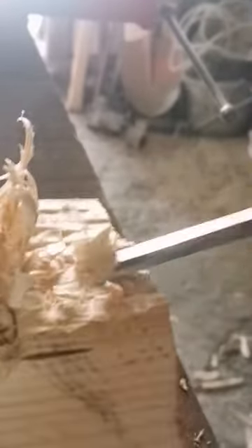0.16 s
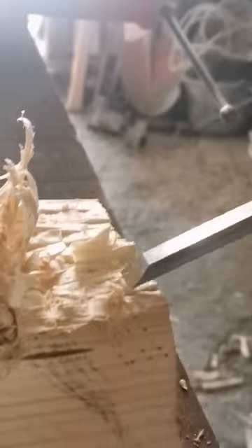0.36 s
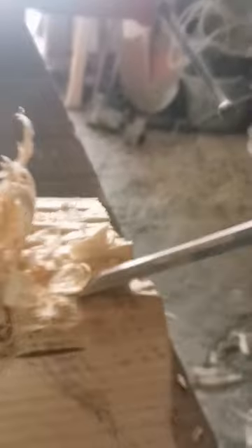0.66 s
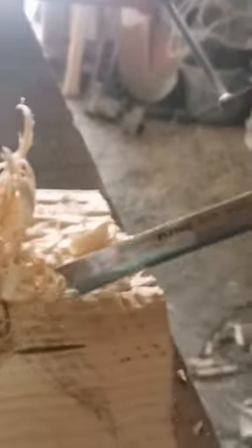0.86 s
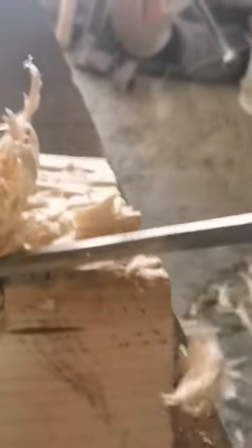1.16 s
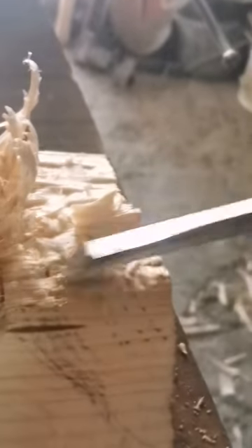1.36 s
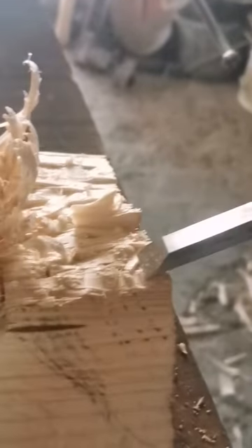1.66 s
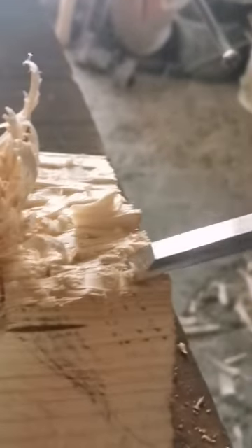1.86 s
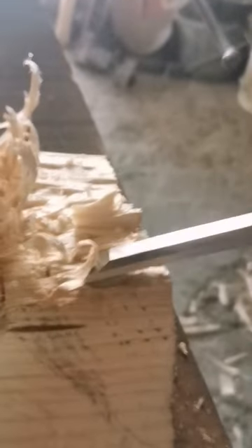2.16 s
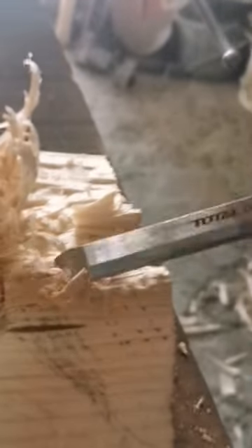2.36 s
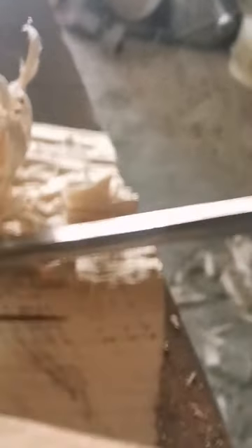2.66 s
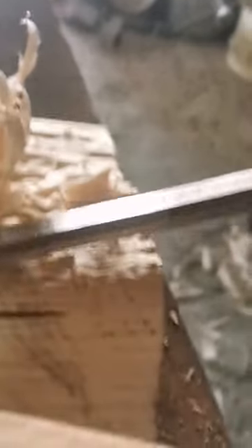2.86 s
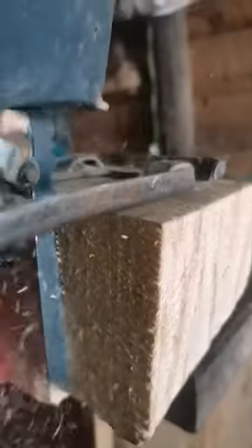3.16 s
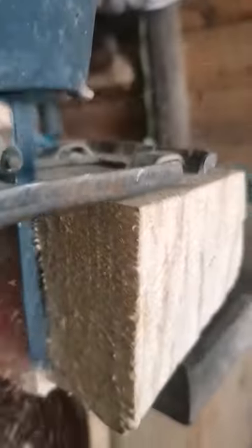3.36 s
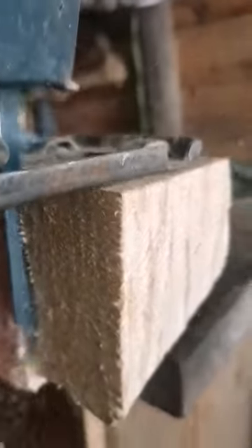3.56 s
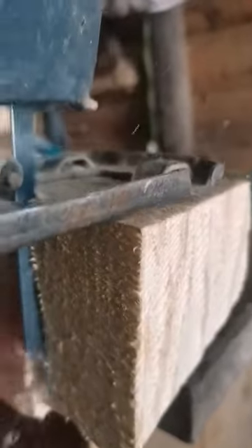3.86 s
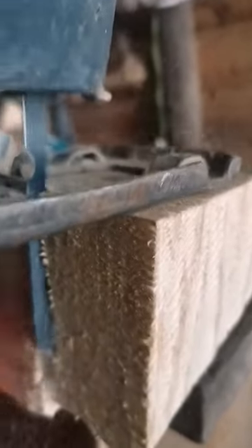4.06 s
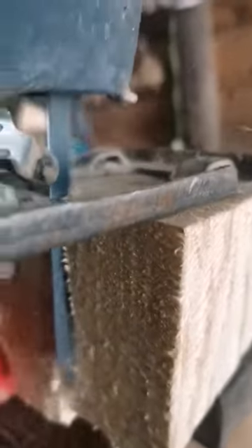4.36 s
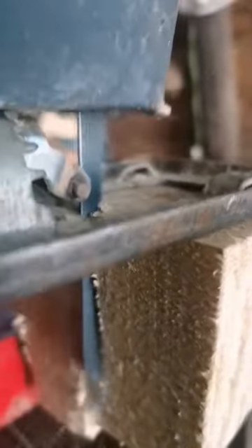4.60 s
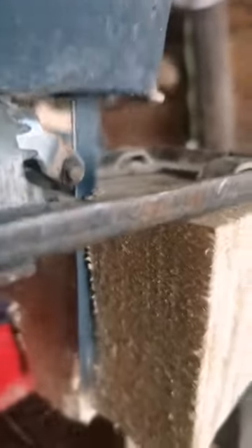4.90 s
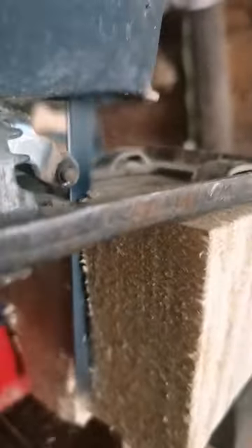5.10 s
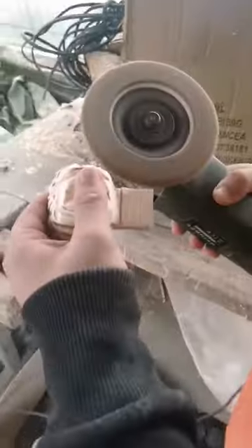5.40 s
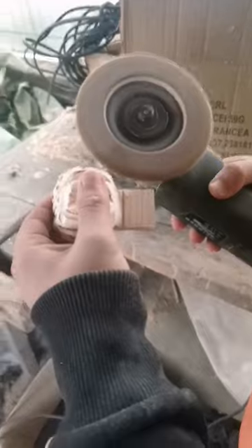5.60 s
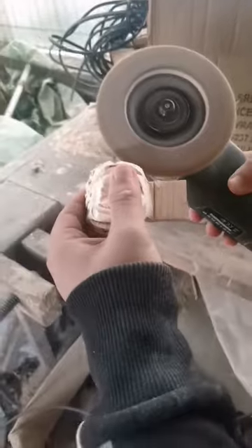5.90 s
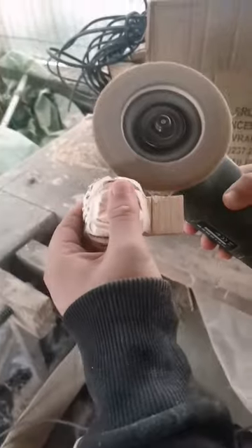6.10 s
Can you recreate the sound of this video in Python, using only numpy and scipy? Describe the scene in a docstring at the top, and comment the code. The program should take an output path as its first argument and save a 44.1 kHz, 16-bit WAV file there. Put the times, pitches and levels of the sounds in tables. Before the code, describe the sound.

Stereo close-up of woodworking in three hard-cut parts. First, about three seconds of chisel work, with stick-slip scrapes, crunching splinters, dull thuds and little steel ticks, body weighted to the right and a short dull room tail. Then a continuous jigsaw, revving up slightly, raspy and buzzing. Last, after a short gap, an abrasive grinder hisses and whines.

```python
"""A hand chisel pares a wooden block, close up in a small shop; then two power tools follow, with hard cuts.
Chisel: the edge sticks and slips, fibres crackle, chips snap, the edge knocks home and the bench rumbles on.
Jigsaw: it runs up to speed through a plank, made of rasping noise, clacks, a fan whistle and motor tones.
Grinder: after a short silence a sanding disc scours wood, made of gritty noise under motor and gear tones."""
import sys
import numpy as np
from scipy import signal
from scipy.fft import rfft, irfft, next_fast_len
from scipy.io import wavfile
from scipy.ndimage import uniform_filter1d, map_coordinates

SR = 44100
rng = np.random.default_rng(int(sys.argv[2]) if len(sys.argv) > 2 else 0)


def file_out(sig):
    """Save sig as 16-bit WAV at sys.argv[1]."""
    # one column per channel
    cols = np.atleast_2d(sig).T
    # limit, then scale
    lim = np.clip(cols, -1, 1)
    pcm = np.round(lim * 32767).astype(np.int16)
    wavfile.write(sys.argv[1], SR, pcm)


N = 275184
TIME = np.arange(N) / SR

# chisel strokes: start [t/s], length [t/s], block [level/dB], fibre crackle [level/dB], nominal slip rate [f/Hz],
# unevenness of the slips [0-1], hollow ring [f/Hz], hollow ring [level/dB]
STROKES = [(0.35, 0.0037, -30, -50.5, 255, 0.37, 1250, -40.5),
           (0.393, 0.023, -24, -56.5, 206, 0.31, 720, -66),
           (0.702, 0.011, -32.5, -47, 231, 0.33, 1330, -50),
           (0.88, 0.024, -22.5, -34.5, 241.3, 0.25, 770, -41),
           (1.086, 0.041, -27, -32.5, 271.7, 0.34, 720, -31.5),
           (1.268, 0.043, -23, -33.5, 308, 0.16, 725, -34),
           (1.572, 0.067, -35.5, -56, 194.6, 0.22, 1250, -51),
           (1.64, 0.075, -22.5, -52, 99.5, 0.08, 1250, -47), (1.812, 0.026, -35, -49, 199, 0.33, 560, -51),
           (2.009, 0.01, -21, -38.5, 226.6, 0.12, 710, -28), (2.179, 0.048, -22.5, -44, 270, 0.1, 740, -29),
           (2.311, 0.034, -22.5, -38.5, 299.5, 0.09, 720, -31),
           (2.361, 0.014, -30.5, -37.5, 309, 0.15, 920, -34.5),
           (2.54, 0.038, -24, -35.5, 294.7, 0.26, 760, -36.5),
           (2.665, 0.053, -21, -35, 259.4, 0.26, 650, -38), (2.724, 0.018, -28, -37, 237, 0.35, 673, -38)]
# chips snapping off: time [t/s], crack before a shared trim [level/dB], left minus right [level/dB],
# lowest ring of the blade [f/Hz], ring [level/dB]
CHIP_SNAPS = [(0.0671, -34, 11, 3540, -44), (0.89, -24, 3, 3240, -32.5), (1.056, -32, 2, 2870, -55),
              (1.121, -42, 0, 3220, -43), (1.3328, -29, -13.5, 2850, -26.5), (2.1837, -30, 9, 2720, -45),
              (2.3545, -18, 11, 2950, -30), (2.5358, -47, 4, 2850, -34), (2.581, -31, 4, 2880, -43),
              (2.69, -31, 16, 2940, -33.5)]
# the block is shoved against the bench: time [t/s], starting strength before the left side is lowered [level/dB]
SHOVES = [(1.286, -20.5), (1.695, -17), (2.698, -15.5)]
# the edge breaks through and knocks into firm wood: time [t/s], peak of the thud [level/dB],
# note of the block [f/Hz], tick of the edge before it is split left and right [level/dB]
KNOCKS = [(0.402, -21, 190, -33.5), (0.7157, -7, 194, -28.5), (0.882, -11.5, 270, -26.5),
          (0.903, -10.5, 200, -36), (1.292, -7, 354, -18.5), (1.493, -20, 211, -33),
          (1.627, -11, 330, -27.5), (1.688, -25, 288, -25.5), (2.01, -9, 235, -34),
          (2.073, -18.5, 317, -36), (2.182, -10, 241, -22), (2.356, -17, 317, -33),
          (2.537, -17, 297, -36.5), (2.703, -11, 239, -16)]
# the blade brushes through loose shavings: time [t/s], rustle [level/dB]
BRUSHES = [(0.219, -50), (2.94, -48)]
# resonances of the block on its bench: centre [f/Hz], width [f/Hz], left [level/dB], right [level/dB]
BLOCK_MODES = [(113.6, 45, -9, -22), (170.4, 19, 5.5, 17), (215, 48, 4.5, 15), (281, 55, -29.5, 19),
               (355, 18.5, 12.5, -0.5), (530, 11, -10.5, -5.5), (715, 28, -13, 0), (940, 76, -2.5, -2.5)]
# modes of the blade: multiple of its lowest ring, relative [level/dB], decay [t/s]
BLADE_MODES = [(1, 0, .0042), (1.94, -4, .0016), (2.44, -1, .0016)]
# relative spectrum of tearing fibres: [f/Hz], left [level/dB], right [level/dB]
FIBRE_COLOUR = [(690, -22, -4.5), (1200, -4.5, 1), (2040, -9, -1), (4300, -3.5, 2), (6580, -2, 1),
                (8500, -9, -14.5), (14100, -7.5, -15)]
# relative spectrum of the bench rumble: [f/Hz], left [level/dB], right [level/dB]
BENCH_COLOUR = [(30, -28, -24), (61.5, -9.5, -4.5), (95.5, -15, -11), (328, -28.5, -20.5), (6000, -74, -72)]
# relative spectrum of the faint steady hiss of the shop: [f/Hz], [level/dB]
HISS_COLOUR = [(300, 7), (1600, -4), (14000, -13)]
# jigsaw loudness over time: time [t/s], before a fixed boost [level/dB], left minus right [level/dB]
SAW_RUN = [(3.07, -25, -4.5), (3.8, -23.5, -1), (4.6, -22.5, 3), (5.42, -22.5, 3)]
# relative spectrum of the jigsaw rasp: [f/Hz], left [level/dB], right [level/dB]
SAW_COLOUR = [(30, -17, -37), (102.4, -13, -20.5), (472, -9, -22), (563, -4, -14.5), (1340, -2, -6),
              (2100, -6, -9), (2780, -5.5, -10), (3550, -8.5, -9.5), (4430, -3, -9.5), (5400, -12, -16),
              (5700, -6.5, -18), (7310, -10, -18), (8150, -17, -34.5), (13900, -12, -38)]
# jigsaw motor tones next to the rasp: multiple of the motor speed, left [level/dB], right [level/dB]
SAW_TONES = [(1, -26, -35), (2, -17, -53)]
# sanding disc loudness over time: time [t/s], [level/dB]
DISC_RUN = [(5.625, -17.5), (5.655, -24), (6.24, -23.5)]
# relative spectrum of the scouring disc: [f/Hz], left [level/dB], right [level/dB]
DISC_COLOUR = [(50, -28.5, -26.5), (392, -17.5, -15.5), (530, -8.5, -10.5), (900, -8, 0), (1410, -13.5, -7),
               (2520, -6.5, -5.5), (3520, -2.5, 4.5), (4160, -12, -10), (7040, -10, -14.5),
               (8960, -18.5, -29), (14200, -14.5, -24)]
# grinder motor and gear tones: nominal pitch [f/Hz], before the left-right balance [level/dB]
DISC_TONES = [(586.8, -38.5), (775.2, -45.5), (2536, -45.5)]
# the backing pad of the disc rings: centre [f/Hz], width [f/Hz]
PAD_MODES = [(3245, 100), (3445, 125), (3605, 105)]
# microphone colour, with a notch in the treble: [f/Hz], gain [level/dB]
MIC_COLOUR = [(8600, 4), (9550, 3), (9900, -35), (10250, -16.5), (10700, -7), (11700, -3), (12650, -18.5),
              (13100, 8), (16000, -5)]

# start and end of each part, seconds
CHISEL_PART, SAW_PART, DISC_PART = (0, 3.064), (3.064, 5.425), (5.611, 6.3)
# every stroke bites (a long one more gradually), eases a little while it cuts, then lets go
BITE_S, BITE_SHARE, EASE_DB_PER_S, RELEASE_S = 0.008, 0.12, 55, 0.011
# the jigsaw motor runs up: turns a second at first and at full speed, time constant, motor turns per blade stroke
SAW_START_HZ, SAW_FULL_HZ, SAW_RUN_UP_S, SAW_GEAR = 434, 482, .43, 9.55
DISC_HZ = 190  # nominal disc turns a second
LAG_SAW, LAG_DISC = 16, 8  # samples by which the power tools reach the right microphone later
TOP_HZ = 16050  # nothing much is left above this


def undb(db):
    """Turn decibels into a gain."""
    return 10 ** (np.asarray(db) / 20)


def unit(x):
    """Scale to an average (rms) strength of 1."""
    return x / np.sqrt(np.mean(x ** 2) + 1e-18)


def curves(table):
    """Draw straight lines between the rows of a time table, one value per sample."""
    s, *columns = np.transpose(table)
    return [np.interp(TIME, s, c) for c in columns]


def colour(x, table):
    """Filter by a spectrum with one column, or one for each channel."""
    hz, *columns = np.transpose(table)
    size = next_fast_len(N + SR // 10)
    log_f = np.log(np.fft.rfftfreq(size, 1 / SR) + 1)
    gain = undb([np.interp(log_f, np.log(hz), c) for c in columns])
    return irfft(rfft(x, size) * gain, size)[..., :N]


def ring(x, hz, width):
    """Let one resonance ring, with gain 1 at its centre."""
    return signal.lfilter(*signal.iirpeak(hz, hz / width, fs=SR), x)


def walk(rate):
    """Wander by chance, rate new values a second, with a spread near 1."""
    knots = rng.standard_normal(int(N / SR * rate) + 2)
    return 1.188 * np.interp(TIME * rate, np.arange(len(knots)), knots)


def grit(rate, spread_db):
    """Tiny fractures of uneven size, each a stereo burst of noise that fades within milliseconds."""
    sizes = undb(spread_db * np.minimum(rng.exponential(size=N), 4))
    cracks = (rng.random(N) < rate / SR) * sizes
    energy = signal.lfilter([1], [1, -np.exp(-1 / (0.0024 * SR))], cracks ** 2)
    return unit(np.sqrt(energy) * rng.standard_normal((2, N)))


def swell(t, rise, fall):
    """A push that builds up to t = 0 and dies away."""
    return np.exp(-np.abs(t) / np.where(t < 0, rise, fall))


def add(out, s, sound):
    """Mix a sound in at time s."""
    start = max(int(s * SR), 0)
    out[..., start:start + sound.shape[-1]] += sound[..., :N - start]


def ports(x, lag, share):
    """The two microphones hear partly the same sound, the right one lag samples later."""
    share = np.clip(share, 0, 1)
    right = share * np.roll(x[0], lag) + np.sqrt(1 - share ** 2) * x[1]
    return np.array([x[0], right])


def between_cuts(span):
    """Open between two hard cuts, with edges softened over 40 samples."""
    return uniform_filter1d(1. * ((TIME >= span[0]) & (TIME < span[1])), size=40)


def cyclic(turns):
    """A stereo rattle that comes round the same on every turn."""
    size = int(1 / np.max(np.diff(turns)))
    place = turns % 1 * size
    return np.array([map_coordinates(grains, [place], mode="grid-wrap")
                     for grains in rng.standard_normal((2, size))])


def patchy(x, depth_db, size=1024, frame_count=5):
    """Uneven noise texture: neighbouring narrow bands swell and fade at random."""
    spectra = signal.stft(x, nperseg=size)[2]
    chance = uniform_filter1d(rng.standard_normal(spectra.shape[1:]), size=5, axis=0)
    chance = uniform_filter1d(chance, size=frame_count, axis=1)
    return unit(signal.istft(spectra * undb(depth_db * unit(chance)))[1][:, :N])


def stroke(t, length):
    """Force of one chisel stroke that starts at t = 0: bite, cut, release."""
    bite = np.minimum(t, 0) / (BITE_S + BITE_SHARE * length)
    release = np.maximum(t - length, 0) / RELEASE_S
    return np.exp(-bite ** 2 - release) * undb(-EASE_DB_PER_S * np.clip(t, 0, length))


def working(rows):
    """The joint level of a run of strokes, whose powers add up; rows are (start s, length s, dB)."""
    power, lead = np.zeros(N), 1 / 8
    t = np.arange(SR // 2) / SR - lead
    for s, length, db in rows:
        add(power, s - lead, (undb(db) * stroke(t, length)) ** 2)
    return np.sqrt(power)


def linger(level, seconds):
    """A level that dies away slowly after whatever drives it."""
    keep = np.exp(-2 / (seconds * SR))  # works on power, hence the 2
    return np.sqrt(signal.lfilter([1 - keep], [1, -keep], level ** 2))


def block(force, top_hz, lag_count=14):
    """The block rings to a force that is dull above top_hz; it is nearer the right microphone."""
    force = signal.sosfilt(signal.butter(3, top_hz, fs=SR, output="sos"), force)
    body = sum(undb([[left], [right]]) * ring(force, f, width) for f, width, left, right in BLOCK_MODES)
    return np.array([np.roll(body[0], lag_count), body[1]])


def bench(sway_hz=80, sway_s=0.014, left_db=-5, rock_db=-15, rock_s=0.3, rest_db=-52):
    """The heavy bench rumbles under the hands, rocks on after each stroke and thumps when shoved."""
    thumps, t = np.zeros(N), np.arange(SR // 2) / SR
    for s, db in SHOVES:
        add(thumps, s, undb(db) * np.sin(2 * np.pi * sway_hz * t) * np.exp(-t / sway_s))
    rumble = unit(colour(ports(rng.standard_normal((2, N)), 0, 0.98), BENCH_COLOUR))
    effort = working((s, length, db) for s, length, db, *_ in STROKES)
    rocking = np.hypot(undb(rest_db), undb(rock_db) * linger(effort, rock_s))
    return thumps * undb([[left_db], [0]]) + rumble * rocking


def hiss():
    """The quiet background under the chisel: steady coloured noise."""
    return undb(-72) * unit(colour(rng.standard_normal((2, N)), HISS_COLOUR))


def snaps(crack_s=0.0018, gain_db=-3):
    """A chip lets go with a sharp crack and the freed blade rings for a moment."""
    out, size = np.zeros((2, N)), SR // 10
    t = np.arange(size) / SR
    splinter = unit(colour(rng.standard_normal(N), FIBRE_COLOUR))
    for k, (s, db, pan_db, hz, ring_db) in enumerate(CHIP_SNAPS):
        crack = undb(db + gain_db) * np.exp(-t / crack_s) * splinter[:, k * size:(k + 1) * size]
        blade = sum(undb(ring_db + mode_db) * np.sin(2 * np.pi * ratio * hz * t) * np.exp(-t / decay_s)
                    for ratio, mode_db, decay_s in BLADE_MODES)
        add(out, s, undb(np.array([[pan_db], [-pan_db]]) / 2) * (crack + blade))
    return out


def fibres(brush_s=0.03):
    """Fibres tear during each stroke; loose shavings settle after it and rustle when the blade brushes them."""
    tearing = working((s, length, db) for s, length, _, db, *_ in STROKES)
    brushing = sum(undb(db) * swell(TIME - s, brush_s, brush_s) for s, db in BRUSHES)
    settling = undb(-21) * linger(tearing, .085)
    rustle = colour(grit(330, 0.98), FIBRE_COLOUR)
    # the fibres give way in bundles
    bundles = grit(750, 4.4) * undb(2.8 * walk(140))
    crackle = patchy(colour(bundles, FIBRE_COLOUR), 3.0)
    return tearing * crackle + unit(rustle) * (brushing + settling)


def paring(slip_db=11, soft_hz=1300, hard_db=-33, octave_db=17, lurch=7, lurch_hz=150, drag_db=-21, drag_s=0.018):
    """The edge sticks and slips through the grain; every slip kicks the block. Even cuts groan, uneven ones rumble."""
    out, lead = np.zeros((2, N)), 1 / 8
    t = np.arange(SR // 2) / SR - lead
    for s, length, db, crackle_db, hz, jitter, *_ in STROKES:
        chance = rng.standard_normal((2, 200))
        slips = np.cumsum(np.exp(jitter * chance[0])) / hz
        slips = slips - slips[len(slips) // 2]  # one slip falls on the first bite
        kicks = undb(slip_db * jitter * chance[1])
        force = unit(np.histogram(slips, len(t), (t[0], t[-1]), weights=kicks)[0])
        # the hand lurches over hard and soft grain
        force = force + jitter * lurch * ring(rng.standard_normal(len(t)), lurch_hz, 90)
        # the blade drags lightly after the cut
        drag = undb(drag_db) * swell(t - length, length / 2, drag_s)
        push = np.maximum(stroke(t, length), drag)
        tearing = .4 * rng.standard_normal(len(t))
        # a push that only presses the wood is duller than one that tears it
        top_hz = np.clip(soft_hz * 2 ** ((crackle_db - hard_db) / octave_db), 420, 2000)
        body = unit(block((force + tearing) * push, top_hz))
        add(out, s - lead, body * undb(db) * np.sqrt(np.mean(push ** 2)))
    return out


def crunch(width_hz=75, lower_ratio=0.81, lower_db=-6, left_db=-10, lag_count=14):
    """Coarser splinters break with the fibres and ring hollowly in the wood, at a pitch that changes by the cut."""
    out, lead = np.zeros(N), 1 / 8
    t = np.arange(SR // 4) / SR - lead
    splinters = grit(350, 4)[0]
    for k, (s, length, *_, hz, db) in enumerate(STROKES):
        push = stroke(t, length)
        force = push * splinters[k * len(t):(k + 1) * len(t)]
        lower = undb(lower_db) * ring(force, lower_ratio * hz, width_hz)
        hollow = ring(ring(force, hz, width_hz) + lower, hz, hz / 2)
        add(out, s - lead, undb(db) * unit(hollow) * np.sqrt(np.mean(push ** 2)))
    return np.array([undb(left_db) * np.roll(out, lag_count), out])


def knocks(contact_s=0.00024, top_hz=750, note_db=4, note_width=55,
           tick_hz=1300, steel_hz=2900, tick_width=450, tick_s=0.0013):
    """The chisel stops dead: the edge ticks and the block rings, at a note set by where the blow lands."""
    out, t = np.zeros((2, N)), np.arange(SR // 5) / SR
    for s, db, note_hz, tick_db in KNOCKS:
        thud = block(np.exp(-t / contact_s), top_hz)
        thud = thud + undb(note_db) * ring(thud, note_hz, note_width)
        crack = rng.standard_normal((2, len(t))) * np.exp(-t / tick_s)
        tick = ring(ring(crack, tick_hz, tick_width), tick_hz, tick_width)
        steel = ring(ring(crack, steel_hz, 2 * tick_width), steel_hz, 2 * tick_width)
        tick = tick + .5 * steel
        add(out, s, undb(db) * thud / np.max(np.abs(thud)))
        add(out, s, undb(tick_db) * np.array([[.5], [1]]) * tick / np.max(np.abs(tick)))
    return out


def workshop(x, t60=0.22, wet_db=-22):
    """The cluttered room adds a short, dull tail of fading noise, 60 dB down after t60 seconds."""
    t = np.arange(SR // 2) / SR
    dull_noise = signal.lfilter([1], [1, -.6], rng.standard_normal((2, len(t))))
    tail = dull_noise * undb(-60 * t / t60) * (t > .008)
    return x + undb(wet_db) * signal.fftconvolve(x, unit(tail) / np.sqrt(len(t)), axes=1)[:, :N]


def jigsaw(rattle_db=-6.0, clack=0.38, clack_turn=0.098, gain_db=2.5, fan_width=130, fan_db=-19):
    """Teeth rasp through the plank; the geared-down blade clacks at both ends of every stroke."""
    db, pan_db = curves(SAW_RUN)
    still_to_gain = np.exp(-np.maximum(TIME - SAW_PART[0], 0) / SAW_RUN_UP_S)
    speed = SAW_FULL_HZ - (SAW_FULL_HZ - SAW_START_HZ) * still_to_gain
    turns = np.cumsum(speed * (1 + 0.003023 * walk(25))) / SR
    strokes = turns / SAW_GEAR
    # the clacks stand out while the cut is still light
    reversal = 1 + clack * undb(np.min(db) - db) * np.exp(-(2 * strokes % 1) / clack_turn)
    rasp = (grit(11000, 0.33) + undb(rattle_db) * cyclic(strokes)) * reversal
    rasp = rasp * undb(.5 * walk(30)) * undb(1.1 * walk(450))
    rasp = colour(ports(rasp, LAG_SAW, 0.35), SAW_COLOUR)
    # the cooling fan whistles hoarsely at ten times the motor speed, rising with it
    low_pass = signal.butter(2, fan_width, fs=SR, output="sos")
    gusts = unit(signal.sosfilt(low_pass, rng.standard_normal((2, N))))
    whistle = gusts * np.sin(2 * np.pi * 10 * turns) * np.array([[2], [1]])
    rasp = unit(rasp) + undb(fan_db + 2 * walk(11)) * whistle
    rasp = patchy(patchy(rasp, 1.15), .8, frame_count=24)  # quick changes, then slower ones
    waver = undb(2.5 * walk(10))
    whine = waver * sum(undb([[left], [right]]) * np.sin(2 * np.pi * k * turns) for k, left, right in SAW_TONES)
    return (rasp + np.sqrt(2) * whine) * undb(db + gain_db + np.array([pan_db, -pan_db]) / 2)


def grinder(rattle_db=-7, bite_s=5.775, bite_hz=480, bite_db=-28, pad_db=-7):
    """Grit scours the wood, harder twice a turn of the warped disc, over the whine of motor and gears."""
    clock = np.cumsum(1 + 0.00332 * walk(30)) / SR  # seconds that run slightly unevenly
    turns = DISC_HZ * clock
    contact = (1 + .26 * np.sin(2 * np.pi * 2 * turns)) * undb(.9 * walk(110))
    scour = (grit(9900, 4.4) + undb(rattle_db) * cyclic(turns)) * contact
    scour = unit(colour(ports(scour, LAG_DISC, 0.4), DISC_COLOUR))
    flutter = contact * undb(3.3 * walk(90))
    pad = unit(flutter * sum(ring(ring(rng.standard_normal((2, N)), hz, width), hz, 4 * width)
                             for hz, width in PAD_MODES))
    scour = patchy(scour, .7) + undb(pad_db + np.array([[-3], [2]])) * pad
    whine = sum(undb(db + 1.5 * walk(60)) * np.sin(2 * np.pi * hz * clock) for hz, db in DISC_TONES)
    # the disc bites deeper once and the workpiece growls
    growl = unit(ring(ring(rng.standard_normal(N), bite_hz, 170), bite_hz, 170))
    growl = growl * undb(bite_db) * swell(TIME - bite_s, 0.032, 0.033)
    return scour * undb(curves(DISC_RUN)[0]) + (np.sqrt(2) * whine + growl) * undb([[-2.5], [1.5]])


def scene():
    """Chisel, jigsaw and grinder in a row."""
    chisel = workshop(paring() + knocks() + fibres() + crunch() + snaps()) + bench() + hiss()
    tools = jigsaw() * between_cuts(SAW_PART) + grinder() * between_cuts(DISC_PART)
    return chisel * between_cuts(CHISEL_PART) + tools


def record(dry):
    """The microphone colours the treble, the loudest peaks are rounded and the top is cut."""
    x = colour(dry, MIC_COLOUR)
    x = x / (1 + (x / .8) ** 4) ** .25
    return signal.sosfilt(signal.ellip(10, .2, 80, TOP_HZ, fs=SR, output="sos"), x)


dry = scene()
out = record(dry)
file_out(out)
```